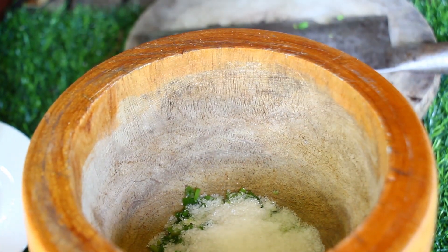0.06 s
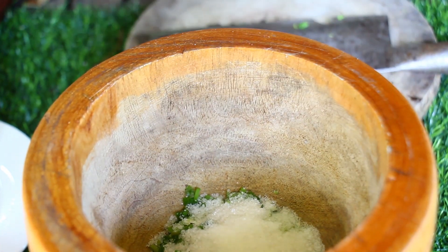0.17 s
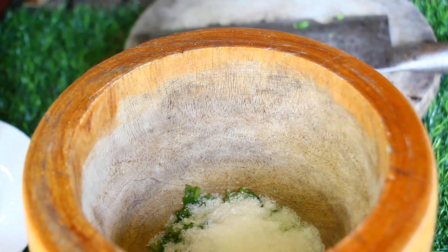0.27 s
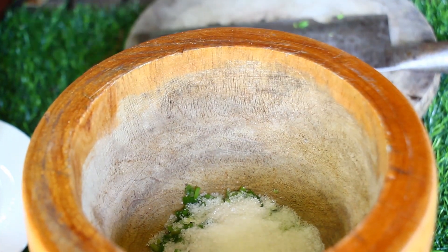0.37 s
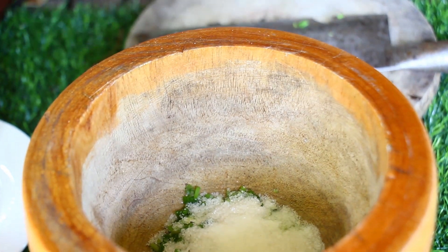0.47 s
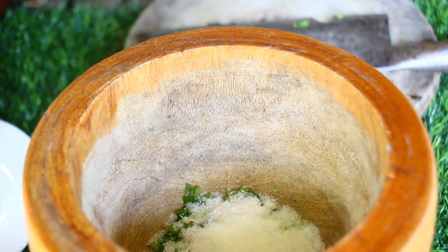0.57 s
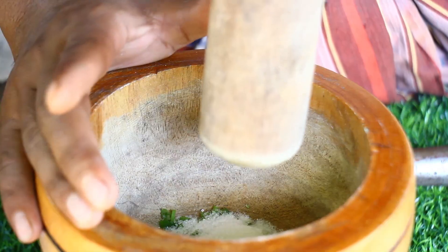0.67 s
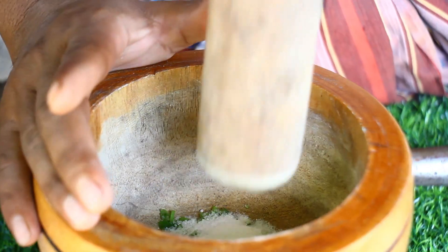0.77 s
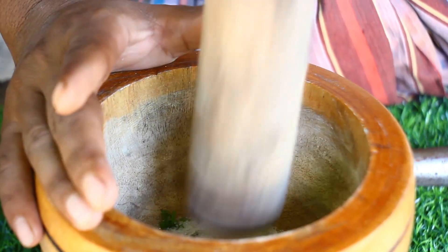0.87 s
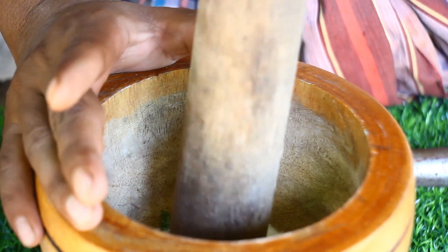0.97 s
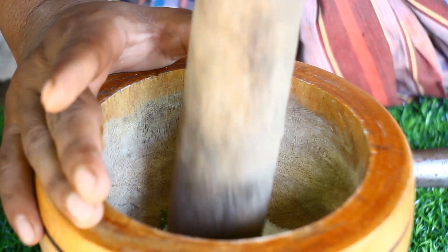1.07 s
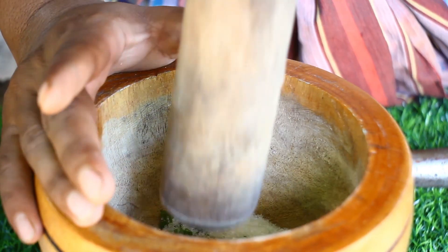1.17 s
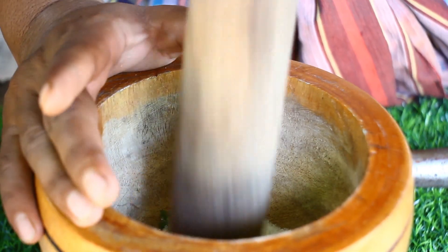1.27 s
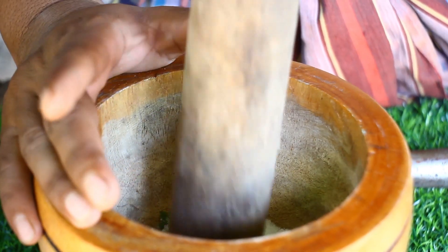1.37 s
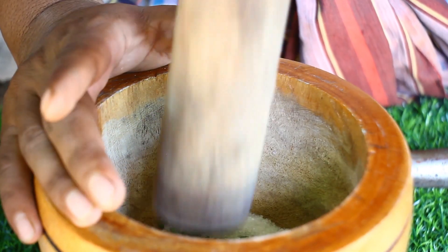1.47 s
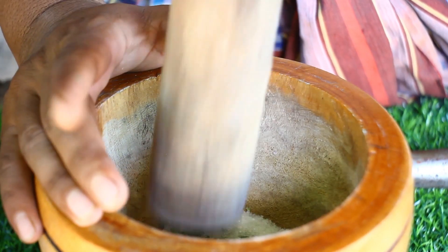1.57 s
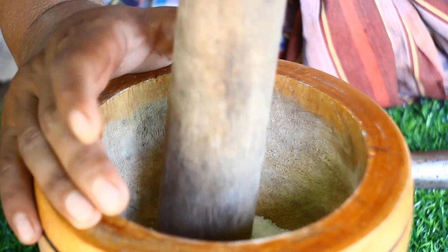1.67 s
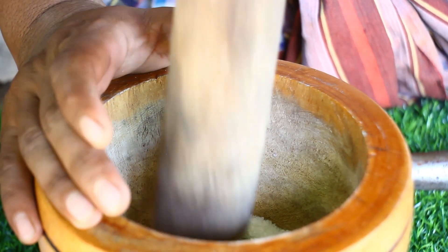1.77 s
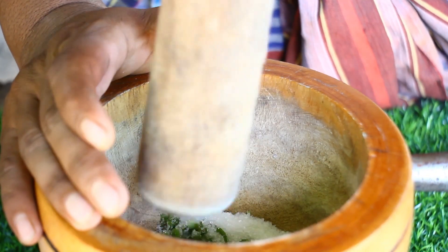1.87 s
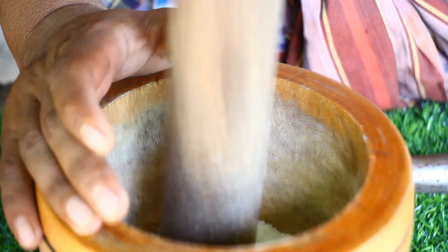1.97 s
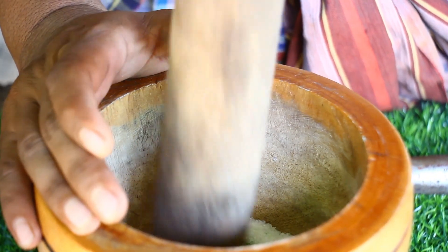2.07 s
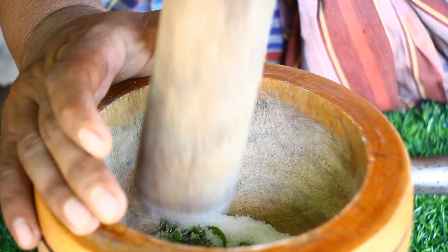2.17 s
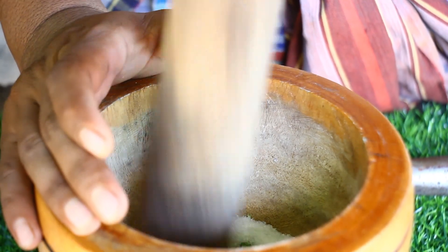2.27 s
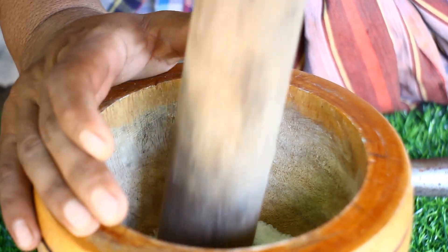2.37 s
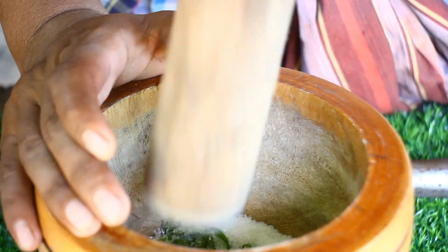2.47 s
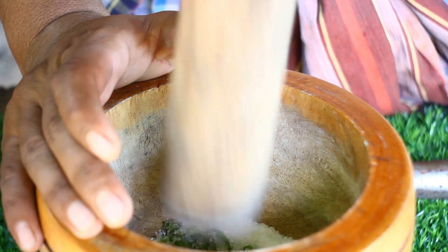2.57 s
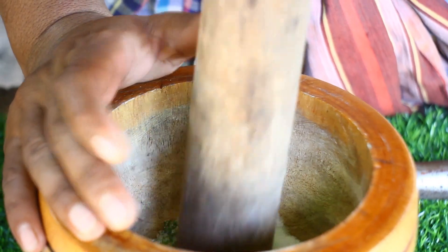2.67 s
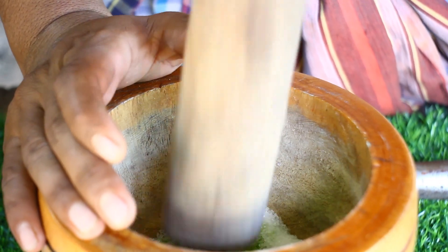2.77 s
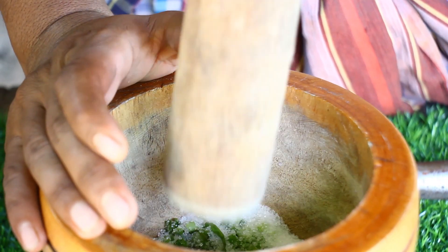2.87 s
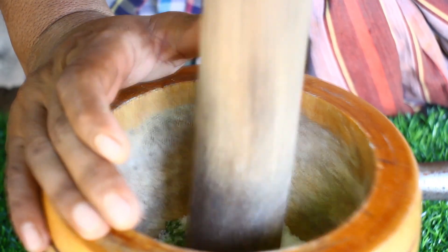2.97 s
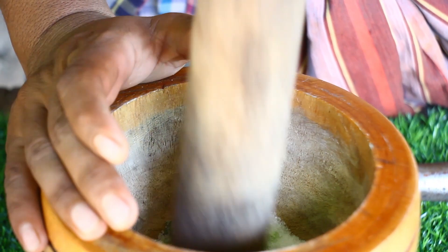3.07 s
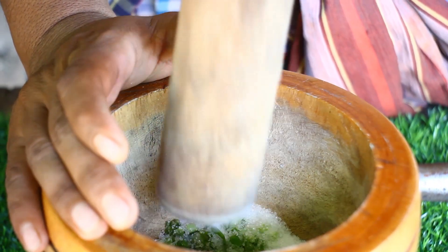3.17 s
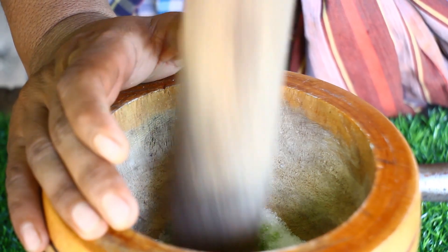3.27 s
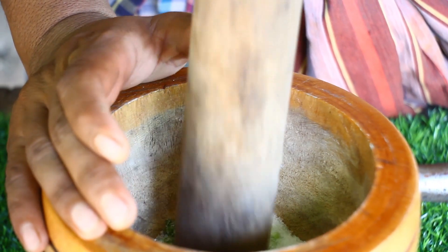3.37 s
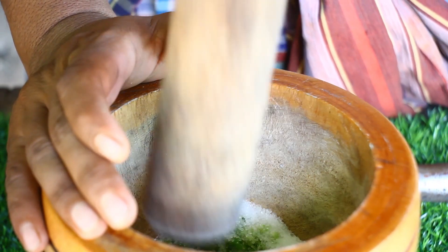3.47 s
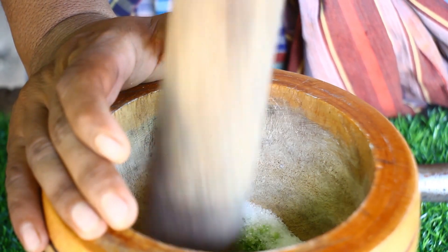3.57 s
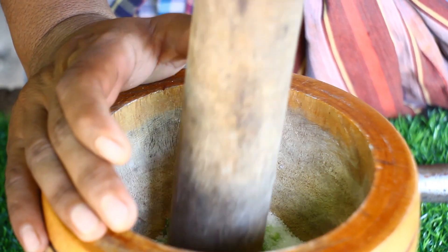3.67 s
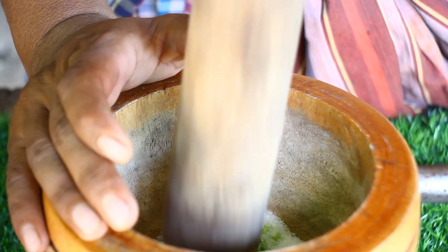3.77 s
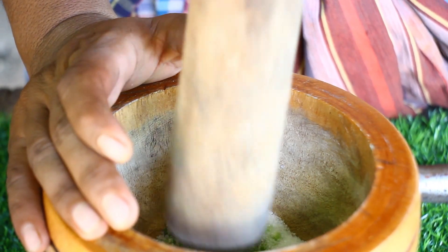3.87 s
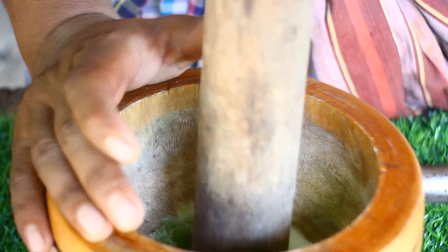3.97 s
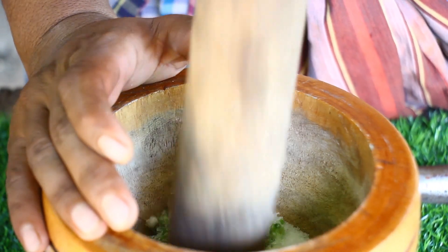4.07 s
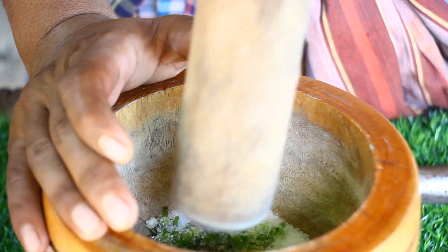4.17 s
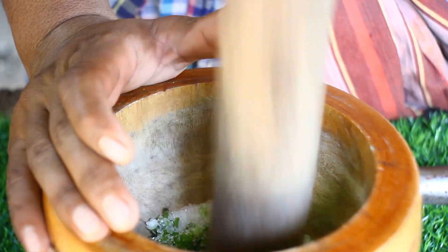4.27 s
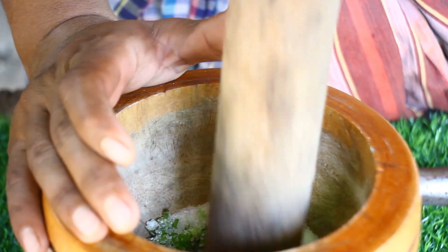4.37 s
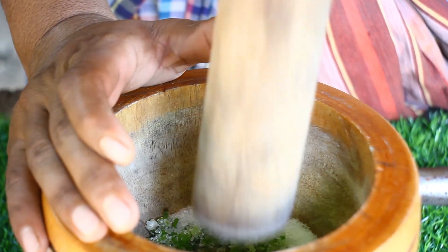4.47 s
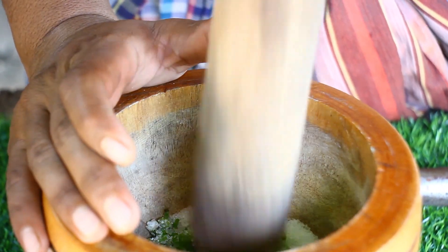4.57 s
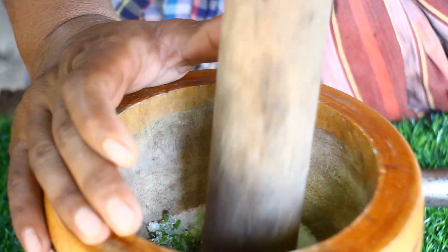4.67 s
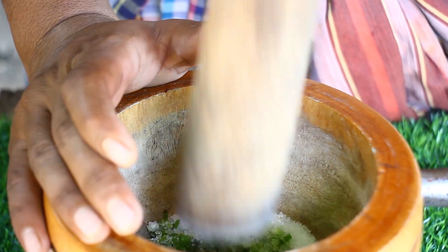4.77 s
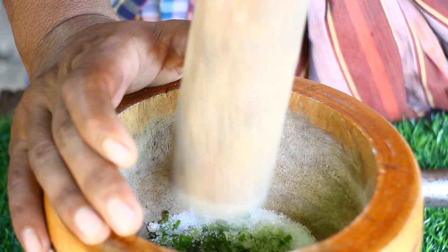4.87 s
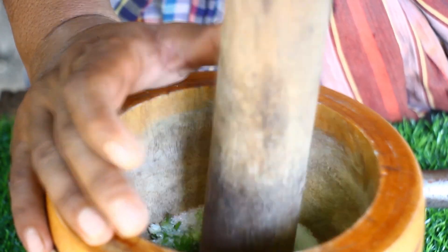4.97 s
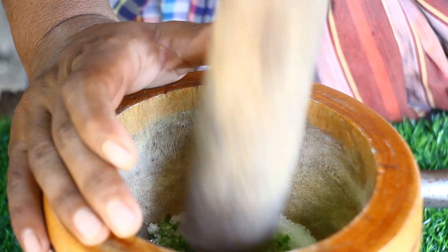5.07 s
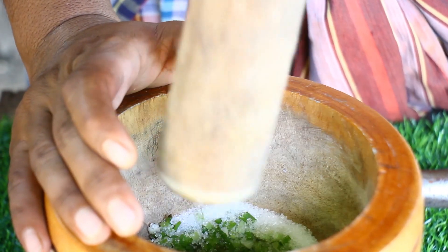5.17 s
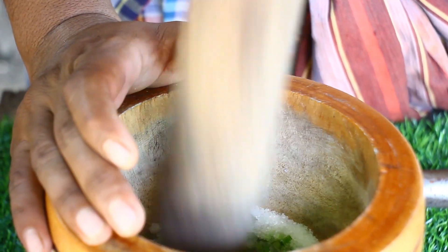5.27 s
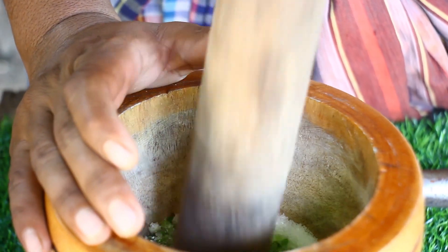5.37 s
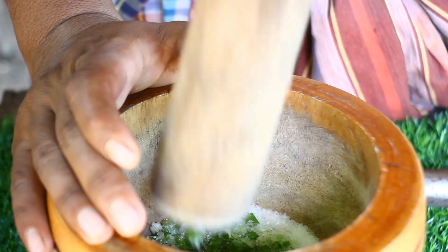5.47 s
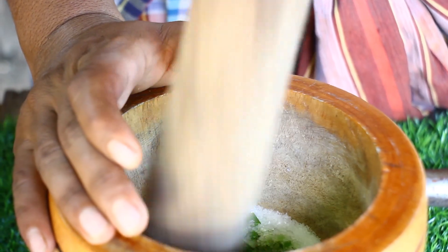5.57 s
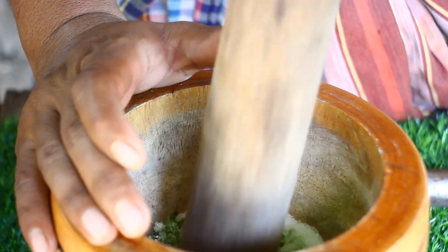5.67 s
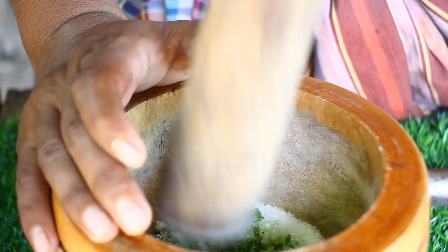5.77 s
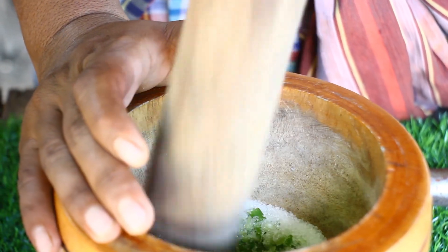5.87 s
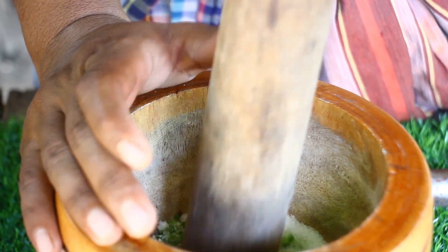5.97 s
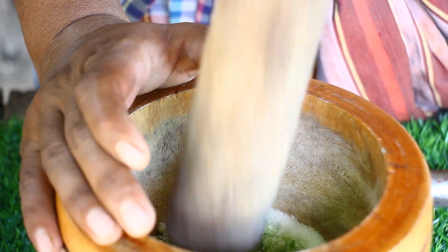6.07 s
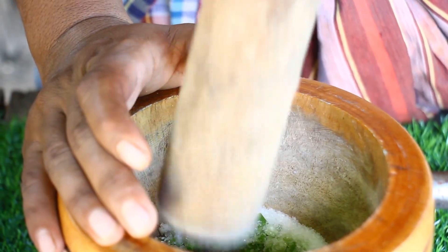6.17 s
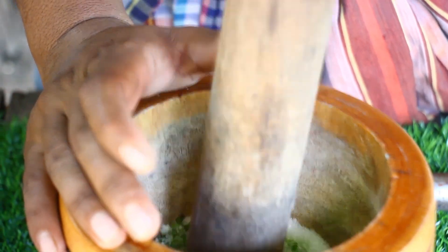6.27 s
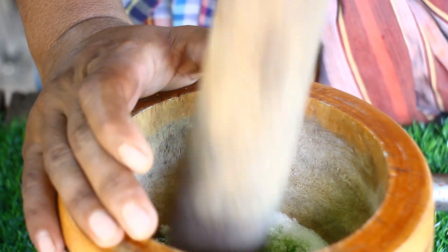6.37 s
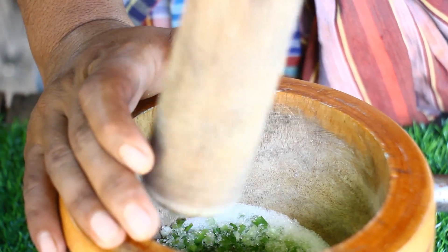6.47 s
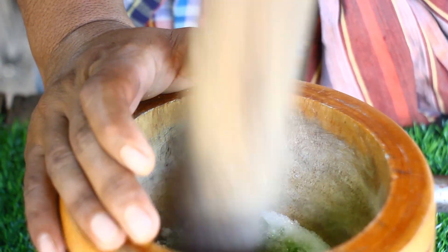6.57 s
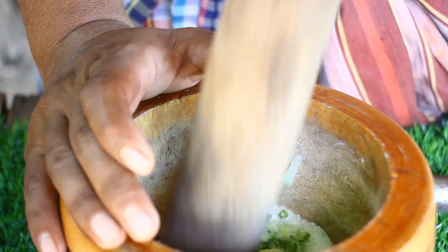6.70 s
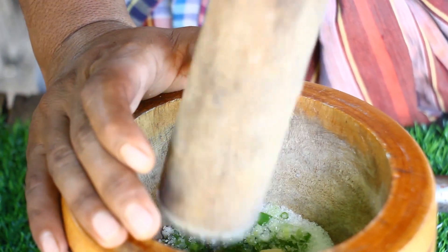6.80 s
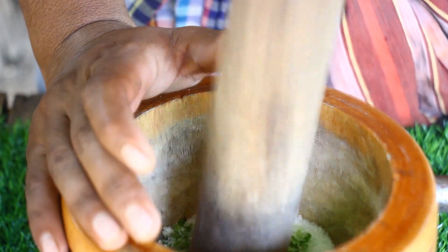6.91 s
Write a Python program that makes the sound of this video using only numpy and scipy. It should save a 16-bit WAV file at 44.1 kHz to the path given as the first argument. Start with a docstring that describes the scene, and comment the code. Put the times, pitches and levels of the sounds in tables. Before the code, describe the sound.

Quiet open air with a low wavering hum and a tiny hollow knock, then rhythmic pounding starts softly and strengthens. Every stroke is a coarse, hollow salt crunch running into a short, dry wooden thump, with light metallic chatter, falling grains and faint gritty dragging between. Very close, dry phone sound, slightly clipped on the loudest hits.

```python
"""A wooden pestle pounds chilies and coarse salt in a deep wooden mortar, three blows a second, close to a phone.
Each blow crushes salt, then thuds on the bottom; a knife lying beside it jumps and rattles; grains fall back and
the pestle drags through the paste, over outdoor air with a low wavering hum. The hardest blows overload the phone."""
import sys
import numpy as np
from scipy import signal
from scipy.fft import rfft, irfft, next_fast_len
from scipy.io import wavfile
from scipy.ndimage import uniform_filter1d

SR = 44100
rng = np.random.default_rng(int(sys.argv[2]) if len(sys.argv) > 2 else 0)


def dump_mix(stems):
    """Bounce the given channels to the path in sys.argv[1] as a 16-bit WAV at rate SR."""
    frames = np.atleast_2d(stems).T  # one column per channel
    limited = np.clip(frames, -1, 1)  # hard clip at full scale
    pcm = np.round(limited * 32767).astype(np.int16)
    wavfile.write(sys.argv[1], SR, pcm)


N = 306054

# salt crushed under the pestle: (s, level dB, hollow ring dB, rise s, hold s)
CRUSH = [(1.032, -14.5, -32, 0.033, 0.008), (1.383, -6.5, -29, 0.011, 0.0022), (1.72, -8, -10, 0.0086, 0.0028),
         (2.0674, -4, -38, 0.013, 0.0022), (2.392, -3, -15.5, 0.0095, 0.0076), (2.7217, -3, -46, 0.0088, 0.0088),
         (3.0632, -5, -41, 0.0093, 0.0059), (3.3842, -1.5, -28, 0.009, 0.0023), (3.71, 0.5, -25, 0.0075, 0.0016),
         (4.0383, -4, -17, 0.013, 0.0094), (4.374, -5, -13, 0.0098, 0.011), (4.7032, -1.5, -46, 0.0071, 0.011),
         (5.053, -1, -7, 0.0053, 0.0015), (5.3936, 0, -38, 0.018, 0.0018), (5.7148, -4, -15, 0.022, 0.0052),
         (6.034, -4, -21, 0.026, 0.0033), (6.355, -2, -2, 0.019, 0.0026), (6.6785, -3, -8, 0.017, 0.005)]
# pestle on the bottom: (s, level dB, first contact dB, contact ms, delay s until the mortar rocks back)
THUDS = [(1.0657, -30, -6, 6, .011), (1.4005, -3, -20, 3.6, .016), (1.7374, 2, -18, 3.2, .028), (2.0837, 7, -13, 3, .031),  # fixed
         (2.4071, .5, -15, 3.2, .029), (2.7370, -2.5, -18, 6, .027), (3.0795, 3.5, -13, 3.1, .024), (3.3995, 7.5, -13, 3, .030),  # fixed
         (3.7250, 7, -9, 3.2, .030), (4.0555, -16, -2.5, 6.5, .020), (4.3888, 0, -17, 3.8, .013), (4.7199, 2, -16, 4.3, .014),  # fixed
         (5.0686, 6, -11, 3.1, .028), (5.4088, 7.5, -10.5, 3.2, .032), (5.7396, 3.5, -9.5, 4.6, .029), (6.0496, 6.5, -8, 3.7, .023),  # fixed
         (6.3726, 8.5, -9.5, 3.6, .036), (6.7056, -.5, -4.5, 6, .024)]  # fixed
MORTAR = [(135, 4, .042), (167, -9, .069), (236, -24, .076), (348, -14, .048)]  # (Hz, dB, t60 s)  # fixed
# the knife chatters; the last tap leaves the blade ringing: (s, length s, level dB, lower blade mode dB, upper blade mode dB)
RATTLES = [(1.414, 0.0026, -36, -49, -60), (1.75, 0.027, -37, -55, -51), (2.072, 0.039, -29, -45, -60),
           (2.42, 0.012, -38, -45, -44), (3.104, 0.0073, -26.5, -42.5, -40.5), (3.410, 0.021, -19.5, -34.5, -30.5),
           (3.729, 0.031, -23, -37.5, -35), (4.409, 0.0072, -29, -42, -53), (5.067, 0.025, -28, -60, -60),
           (5.096, 0.0043, -22.5, -30.5, -31), (5.432, 0.012, -25, -41.5, -38), (6.06, 0.011, -28, -45, -31),
           (6.37, 0.04, -25.5, -37, -45.5)]
# quick modes of the knife: (Hz, dB, t60 s)
KNIFE = [(2055, -8.5, 0.041), (3070, -4, 0.026), (3226, -12.5, 0.19), (3275, -6, 0.096), (3960, -7, 0.081), (4872, 0.5, 0.055), (4950, -7, 0.14),
         (5630, -11, 0.04), (6220, -8.5, 0.038), (6670, -5.5, 0.07), (7930, -37, 0.12), (8780, -8, 0.02), (9220, -16, 0.1),
         (10620, -16, 0.033), (11500, -17, 0.082), (12830, -25, 0.061), (13100, -22, 0.06), (14450, -32, .07)]
# salt dropping back on the wall, the louder showers: (s, level dB, centre Hz, t60 s)
FALLS = [(0.689, -31.5, 2120, 0.038), (2.175, -26, 2260, 0.11), (2.2483, -37, 1570, 0.04), (2.4864, -29, 6140, 0.028),
         (2.499, -30.5, 2310, 0.04), (2.8321, -22.5, 3560, 0.039), (2.91, -29.5, 3700, 0.06), (2.993, -26, 1980, 0.13),
         (3.034, -29, 2760, 0.15), (3.284, -34.5, 4700, 0.14), (3.3119, -34, 3300, 0.084), (3.6088, -33.5, 5660, 0.11),
         (3.651, -36.5, 4610, 0.2), (4.128, -28, 3900, 0.038), (4.48, -22, 2440, 0.26), (4.587, -28, 2960, 0.18),
         (4.799, -27, 1920, 0.17), (4.9733, -34, 7000, 0.053), (5.2386, -36.5, 3060, 0.099), (5.8193, -24.5, 2660, 0.042),
         (6.133, -34, 3500, 0.037), (6.211, -33, 3680, 0.034), (6.7746, -24, 2670, 0.057), (6.8793, -28.5, 3660, 0.034)]
SALT = [(290, 8.5), (500, -1.5), (740, 7), (1250, 0.5), (1480, -1), (1690, -1), (2160, -1), (2460, 1.5), (2730, 2.5),
        (8580, -7), (14900, -27), (16000, -16)]  # (Hz, dB)
HOLLOW_HZ, HOLLOW_WIDTH_HZ = 742, 120  # fixed
LONGEST_CRUSH_S = .09  # fixed
# small knocks nearby: (s, level dB, upper mode dB)
KNOCKS = [(0.0604, -28.5, -11), (0.069, -46, -15), (3.212, -28, 7.5)]
KNOCK_MODES = [(450, 0.028), (1060, 0.021)]  # (Hz, t60 s)
AIR = [(15, -49), (25, -17), (43, -3), (108, -1), (149, -1.5), (170, -9), (326, -12.5), (575, -11), (641, -11.5),
       (775, -13), (1020, -14.5), (2690, -24), (16000, -54)]  # (Hz, dB per Hz)
HISS_DB = -61
# the air swells: (s, bass dB, middle dB)
SWELL = [(0.0, -49, -51.5), (0.7, -51.5, -54.5), (1.6, -48, -54), (2.8, -48.5, -51), (3.7, -49.5, -54.5), (4.4, -51, -51),
         (5.3, -48, -52), (5.72, -50.5, -55), (5.95, -49, -47), (6.5, -52, -55.5), (6.94, -49, -49)]
HUM = [(61.9, 2.2, -6.5), (116, 6.4, -6.5)]  # (Hz, width Hz, dB over the bass)
TOP_HZ = 15900  # fixed
ROCK_MODES = [(80, 0.11), (180, 0.035), (390, 0.022)]  # (Hz, t60 s)
BLADE = [(1082, .3), (2288, .4)]  # slow modes of the knife: (Hz, t60 s)  # fixed
BLADE_FREE_S = 0.07
RING_DB = 4  # resonant share of the hollow  # fixed
# upper resonances of the hollow: (Hz, width Hz, dB)
HOLLOW = [(1465, 110, 0), (2040, 90, -3), (2210, 120, 0), (2700, 110, -2), (3490, 110, -3), (4320, 90, -4), (4810, 150, -4), (5440, 100, -6)]  # fixed
WALL = [(254, -21.5, 0.052), (388.4, -17.5, 0.094), (557, -42, 0.029)]  # quick wall modes: (Hz, dB, t60 s)
# faint rubbing sounds, broad and narrow, one low moan, and a brief ringing knock near 1.75 s: (s, length s, Hz,
# width Hz, dB)
RUBS = [(0.118, 0.15, 158, 9.1, -46.5), (.33, 0.064, 2740, 70, -57), (1.753, 0.039, 2374, 53, -29.5), (2.084, .12, 3850, 4900, -39.5),
        (2.968, 0.093, 2970, 5900, -46.5), (3.126, 0.27, 2500, 4600, -51.5), (4.15, 0.22, 1520, 390, -54), (4.475, 0.11, 2780, 6200, -38.5),
        (4.744, .11, 3000, 8300, -42.5), (4.878, 0.068, 2710, 60, -54), (5.162, 0.076, 1030, 160, -40), (5.207, 0.077, 1200, 240, -40.5),
        (5.756, 0.51, 2260, 940, -47), (5.8, .2, 2720, 75, -56), (5.798, 0.19, 1510, 90, -54), (6.12, .12, 2050, 84, -47)]
# a thick bed of salt crunches long and stops short: t60 = CRUSH_T60_S - SHORTER_PER_HOLD * hold
CRUSH_T60_S, SHORTER_PER_HOLD, SHORTEST_CRUSH_S = 0.14, 15.8, 0.041
LEAD_S = 0.008075  # first contact before the thud
ROCK_DB, ROCK_PER_THUD_DB = -21, 0.6  # after a 0 dB thud; dB per dB of thud
WOBBLE_DB, CUSHIONED_THUD_DB, WOBBLE_FALL_DB = -28.5, -5, 0.3  # bass wobble: top, the thud that gives most, dB lost per dB away
STRAY_DB, STRAY_HZ, STRAY_T60_S = -41, 3000, 0.045  # the faint showers in between
DRAG_DB, DRAG_FROM_S = -69, 1
DRAG_SWING_DB, STRAY_SPREAD_DB = 3, 4  # fixed
PUSH_S = None
GROUND_S, GROUND_DB, RADIATE_HZ = .0034, -4.5, 100  # fixed
FALL_HOLLOW_DB = -8


def undb(db):
    return 10 ** (np.asarray(db) / 20)


def level(x, db):
    return x * undb(db) / np.sqrt(np.mean(x ** 2))


def add(out, s, x):
    """Mix x into out from time s."""
    i = max(int(s * SR), 0)
    out[i:i + len(x)] += x[:len(out) - i]


def ring(x, hz, t60):
    """One decaying mode; a unit click rings with size 1."""
    p = np.exp(2j * np.pi * hz / SR - np.log(1000) / (max(t60, .004) * SR))
    return signal.lfilter([1], [1, -p], x).imag


def colour(x, table):
    """Shape the spectrum by (Hz, dB) points."""
    hz, db = np.transpose(table)
    size = next_fast_len(len(x))
    f = np.arange(size // 2 + 1) * SR / size + 1
    return irfft(rfft(x, size) * undb(np.interp(np.log(f), np.log(hz), db)), size)[:len(x)]


def band(x, hz, width):
    """Resonance of gain 1."""
    return signal.lfilter(*signal.iirpeak(hz, hz / width, fs=SR), x)


def walk(rate):
    """Random levels held 1 / rate s and slewed twice."""
    k = int(SR / rate)
    return 1.8 * uniform_filter1d(uniform_filter1d(np.repeat(rng.standard_normal(N // k + 1), k), k), k)[:N]


def curve(table, column):
    rows = np.array(table)
    return np.interp(np.arange(N) / SR, rows[:, 0], rows[:, column])


def burst(rise, hold, t60):
    """Envelope: rise that starts as a creep, plateau, exponential fall."""
    rise, hold, t60 = max(rise, .0005), max(hold, 0), max(t60, .005)  # fixed
    t = np.arange(int(.4 * SR)) / SR  # fixed
    return np.sin(np.pi / 2 * np.clip(t / rise, 0, 1)) ** 4 * 1000. ** (-np.clip(t - rise - hold, 0, None) / t60)  # fixed


def grit(scatter_db):
    """Dense cracking crystals of very uneven size; rms 1."""
    return level(rng.standard_normal(N) * undb(scatter_db * rng.exponential(size=N)), 0)


def crush():
    """Salt cracks in a rush; the hollow of the mortar rings with it and a thin trail follows."""
    dry, hollow = np.zeros(N), np.zeros(N)
    for s, db, hollow_db, rise, hold in CRUSH:
        t60 = np.clip(CRUSH_T60_S - SHORTER_PER_HOLD * hold, SHORTEST_CRUSH_S, LONGEST_CRUSH_S)
        shape = burst(rise, hold, t60) + undb(-12.5) * burst(rise, hold, 0.27)
        add(dry, s - rise * 0.64, undb(db) * shape)
        add(hollow, s - rise * 0.78, undb(db + hollow_db) * burst(rise, hold, 0.058))
    cracks = grit(2.8)  # fixed
    ringing = band(band(cracks, HOLLOW_HZ, HOLLOW_WIDTH_HZ), HOLLOW_HZ, 2 * HOLLOW_WIDTH_HZ)
    return undb(-16 + 1.53 * walk(300)) * in_mortar(cracks, RING_DB) * dry + level(ringing, -14) * hollow


def thuds():
    """The paste brakes the pestle first, then it meets the wood and the ground pushes back; the pushes ring the mortar."""
    force = np.zeros(N)
    for s, db, first_db, contact_ms, _ in THUDS:
        push = np.hanning(int(contact_ms * SR / 1000))  # fixed
        push, s = push / push.sum(), s - len(push) / SR / 2
        add(force, s - LEAD_S, -undb(db + first_db) * push)
        add(force, s, undb(db) * push)
        add(force, s + GROUND_S, undb(db + GROUND_DB) * push)
    body = sum(undb(db) * ring(force, hz, t60) for hz, db, t60 in MORTAR + WALL)
    # a small body radiates little deep bass
    return signal.sosfilt(signal.butter(2, RADIATE_HZ, "high", fs=SR, output="sos"), body)


def knife():
    """A string of quick taps shares its energy among the modes; the blade rings on until it settles."""
    out, free = np.zeros(N), burst(0.0025, BLADE_FREE_S, 0.084)
    tap = np.r_[1., np.zeros(len(free) - 1)]
    for s, length, db, *blade_db in RATTLES:
        shape = burst(.001, length, .02)  # fixed
        taps = (rng.random(len(shape)) < 2500 / SR) * rng.standard_normal(len(shape)) * shape
        modes = [ring(taps, hz, t60) for hz, _, t60 in KNIFE]
        modes = sum(undb(g) * m / np.abs(m).max() for m, (_, g, _) in zip(modes, KNIFE))
        add(out, s, undb(db) * (modes + 1.1 * band(taps, 2000, 8800)))
        add(out, s + length, free * sum(undb(g) * ring(tap, *mode) for g, mode in zip(blade_db, BLADE)))
    return out


def falls():
    """Short showers of grains, each with its own colour; a faint one follows every blow at a chance moment."""
    out, cracks = np.zeros(N), grit(2.2)  # fixed
    chance = rng.standard_normal((len(CRUSH), 3))
    strays = [(blow[0] + 0.23 + .05 * a, STRAY_DB + STRAY_SPREAD_DB * b, STRAY_HZ * 0.7 ** c, STRAY_T60_S)
              for blow, (a, b, c) in zip(CRUSH, chance)]
    for s, db, hz, t60 in FALLS + strays:
        shape = burst(0.0014, 0.00068, t60)
        grains = np.roll(cracks, -int(s * SR))[:len(shape)]
        add(out, s - .001, undb(db) * shape * level(band(grains, hz, 0.8 * hz), -11.0))
        add(out, s, undb(db + FALL_HOLLOW_DB) * shape * level(band(grains, HOLLOW_HZ, HOLLOW_WIDTH_HZ), -11.5))
    return out


def drag():
    """Stick and slip of salt between pestle and wall, once the pounding has begun."""
    busy = np.clip((np.arange(N) / SR - DRAG_FROM_S) / 0.35, 0, 1)
    return in_mortar(grit(2.25), RING_DB) * busy * undb(DRAG_DB + DRAG_SWING_DB * walk(6.11) + 3.5 * walk(83))


def knocks():
    """Dull taps on something hollow."""
    out, click = np.zeros(N), np.r_[1., np.zeros(SR // 10)]
    for s, db, upper_db in KNOCKS:
        add(out, s, undb(db) * sum(g * ring(click, *mode) for g, mode in zip((1, undb(upper_db)), KNOCK_MODES)))
    return out


def air():
    """Outdoor noise whose bass and middle swell apart, with narrow wavering hum lines."""
    noise = colour(rng.standard_normal(N), AIR)
    bass = signal.sosfiltfilt(signal.butter(2, 250, fs=SR, output="sos"), noise)
    top = signal.sosfiltfilt(signal.butter(2, 4000, "high", fs=SR, output="sos"), noise)
    hum = sum(level(band(rng.standard_normal(N), hz, width), db) for hz, width, db in HUM)
    out = (level(bass, 0) + hum) * undb(curve(SWELL, 1) + 1.76 * walk(4.85))
    out += level(noise - bass - top, 0.17) * undb(curve(SWELL, 2) + 1.1 * walk(25)) + level(top, HISS_DB)
    return out


def rocks():
    """A soft second bump with a rumble of uneven contact before and after it."""
    out = np.zeros(N)
    for s, thud_db, *_, delay in THUDS:
        shape = burst(0.0049, 0.0015, 0.13)
        force = 0.05 * shape * rng.standard_normal(len(shape))
        force[int(.015 * SR)] += 1
        force = uniform_filter1d(force, size=40)
        db = ROCK_DB + ROCK_PER_THUD_DB * thud_db
        gains = undb([WOBBLE_DB - WOBBLE_FALL_DB * abs(thud_db - CUSHIONED_THUD_DB), db, db])
        add(out, s + delay - .015, sum(g * ring(force, *mode) for g, mode in zip(gains, ROCK_MODES)))
    return out


def in_mortar(cracks, ring_db):
    """Cracks of salt as heard out of the resonant hollow; rms 1."""
    ringing = sum(undb(db) * band(cracks, hz, width) for hz, width, db in HOLLOW)
    return level(colour(cracks + undb(ring_db) * ringing, SALT), 0)


def rubs():
    """Grainy swells of one colour each, in uneven clusters."""
    out = np.zeros(N)
    salt = grit(2.8) * undb(3 * walk(70))  # fixed
    for s, length, hz, width, db in RUBS:
        noise = level(band(band(salt[int(s * SR):][:SR], hz, width), hz, min(2 * width, 9000)), db)[SR // 4:]
        add(out, s, np.sqrt(np.hanning(int(length * SR))) * noise[:int(length * SR)])
    return out


def scene():
    return (crush() + thuds() + rocks() + knife() + falls() + drag() + rubs() + knocks() + air())[None]


def record(dry):
    """The microphone drops the deepest bass; the phone clips at full scale and cuts the top."""
    mic = signal.sosfilt(signal.butter(1, 35, "high", fs=SR, output="sos"), dry) * undb(.6)  # fixed
    return signal.sosfilt(signal.ellip(10, .2, 90, TOP_HZ, fs=SR, output="sos"), np.clip(mic, -1, 1))  # fixed


dry = scene()
out = record(dry)
dump_mix(out)
```